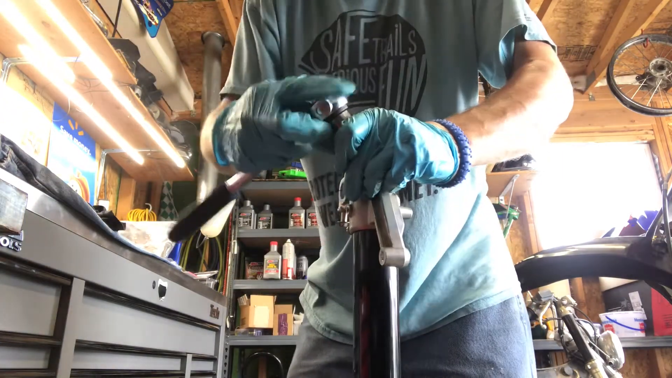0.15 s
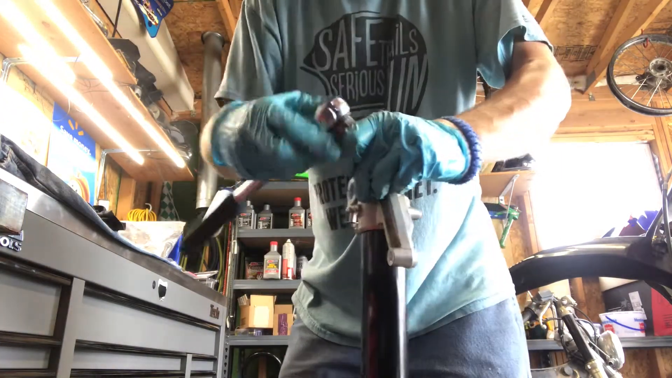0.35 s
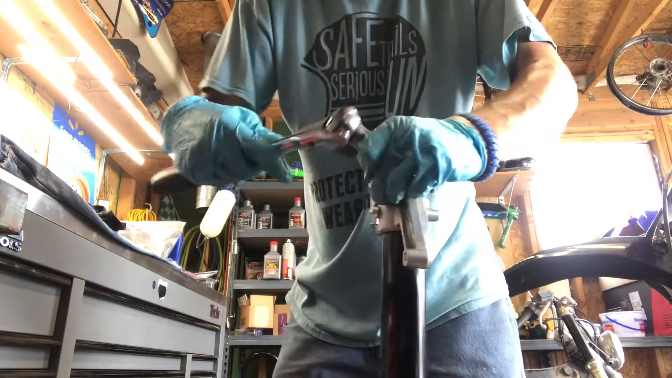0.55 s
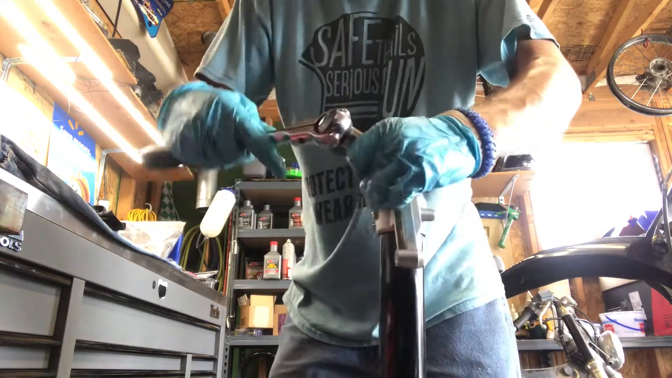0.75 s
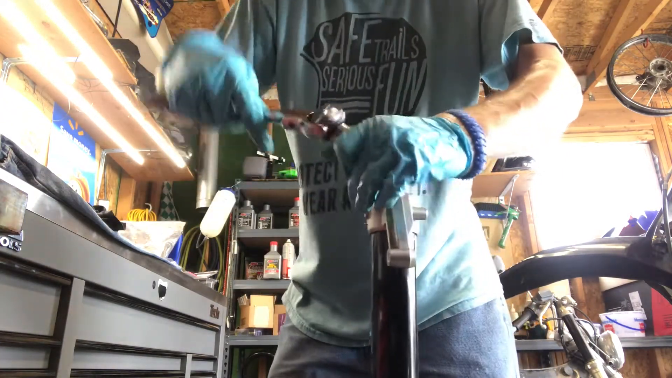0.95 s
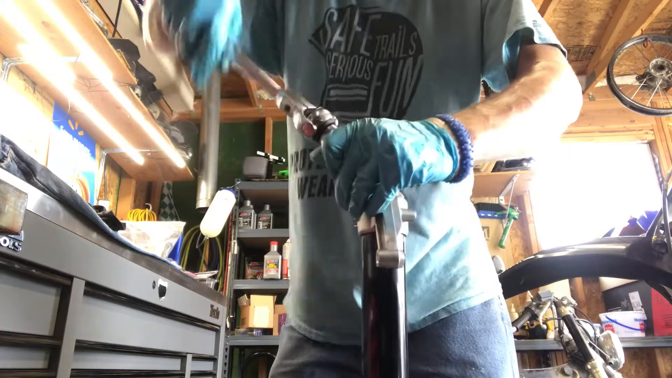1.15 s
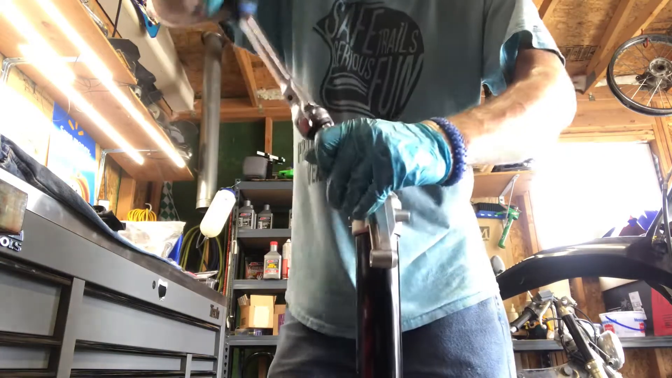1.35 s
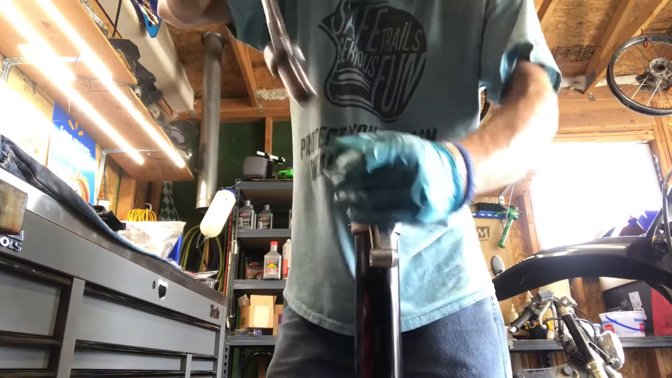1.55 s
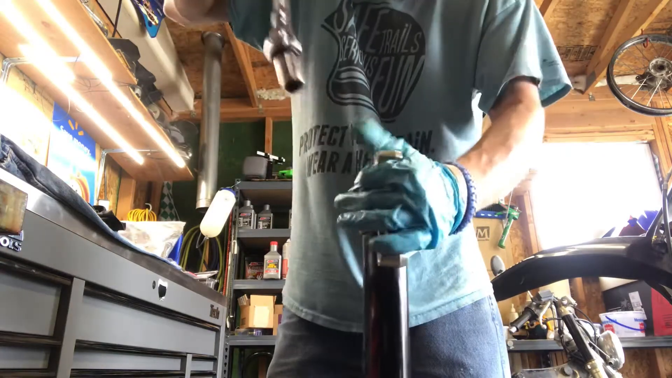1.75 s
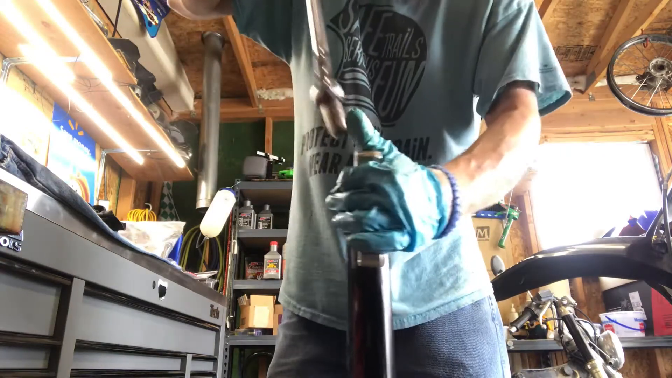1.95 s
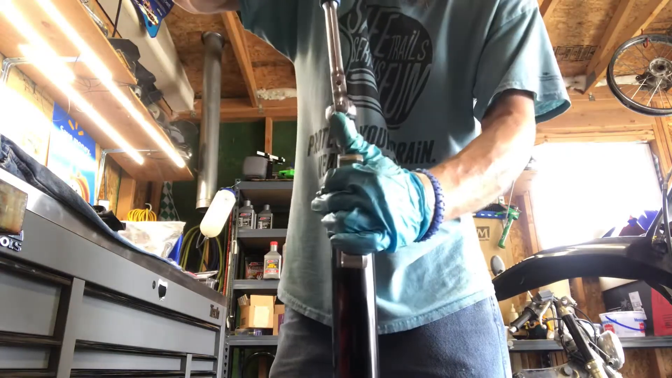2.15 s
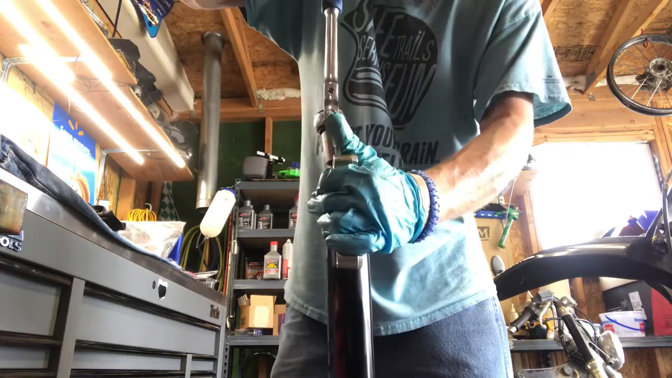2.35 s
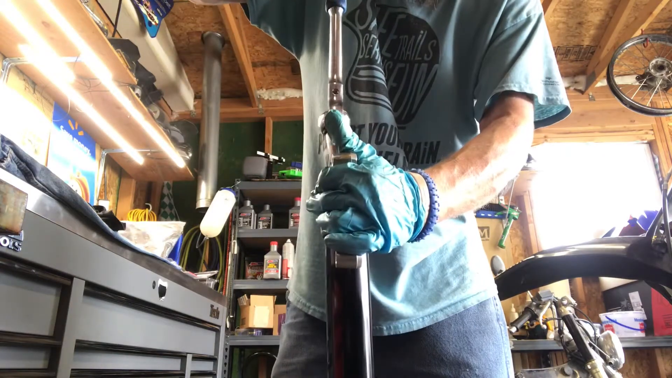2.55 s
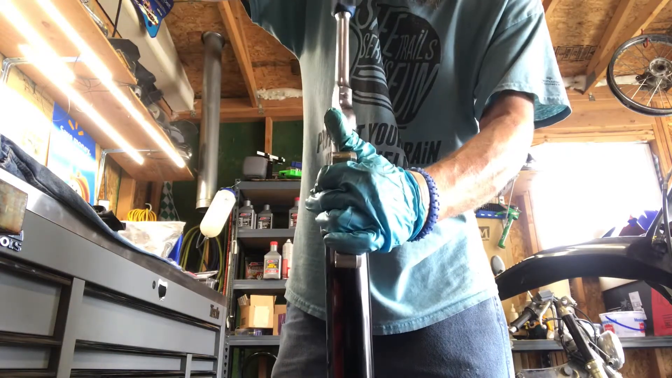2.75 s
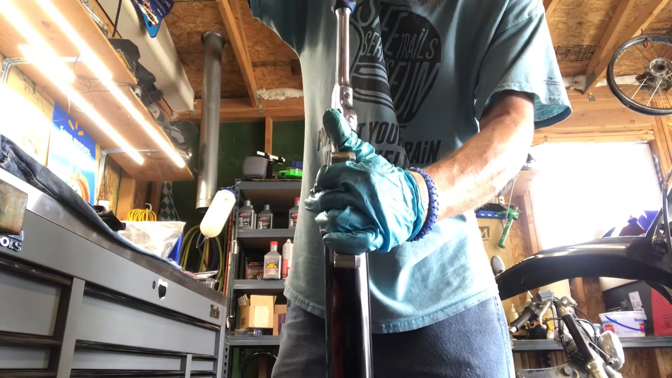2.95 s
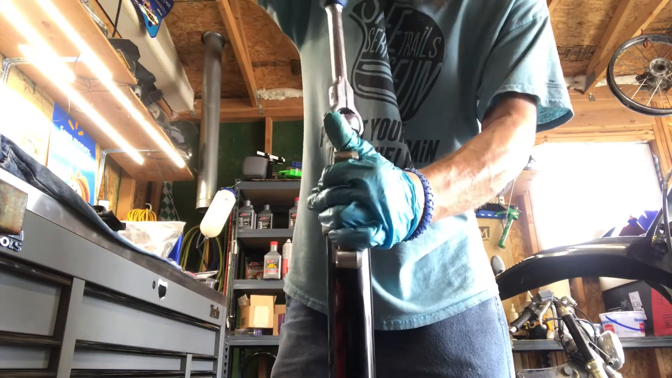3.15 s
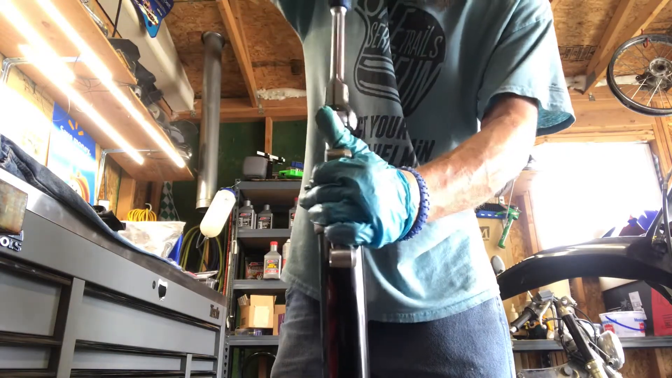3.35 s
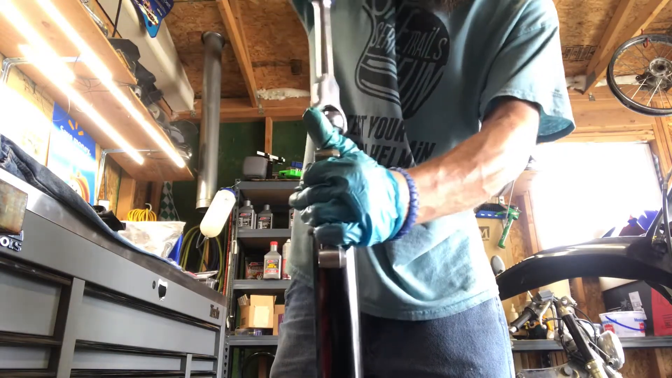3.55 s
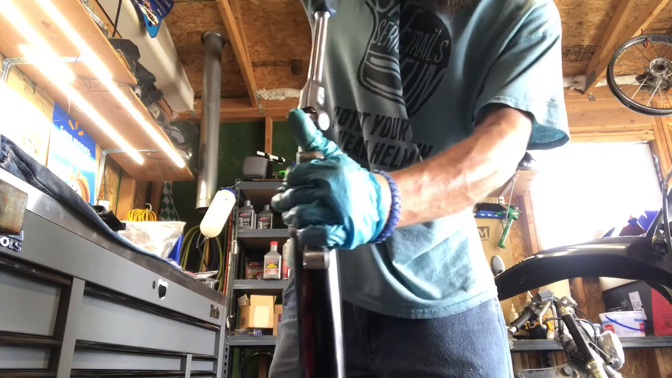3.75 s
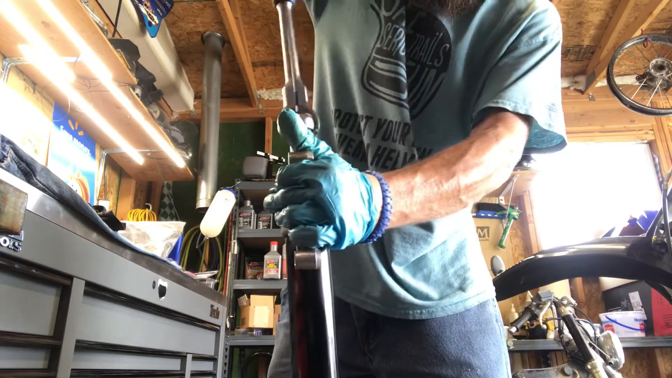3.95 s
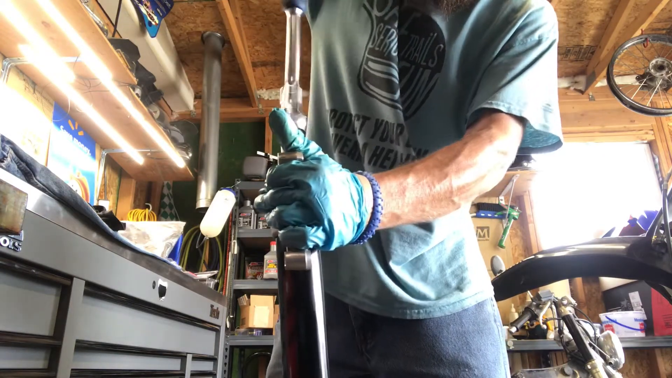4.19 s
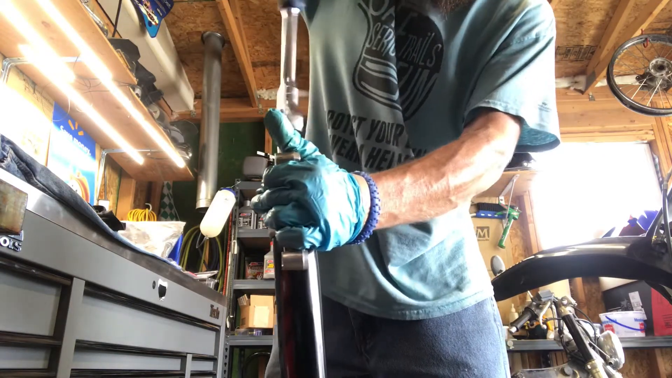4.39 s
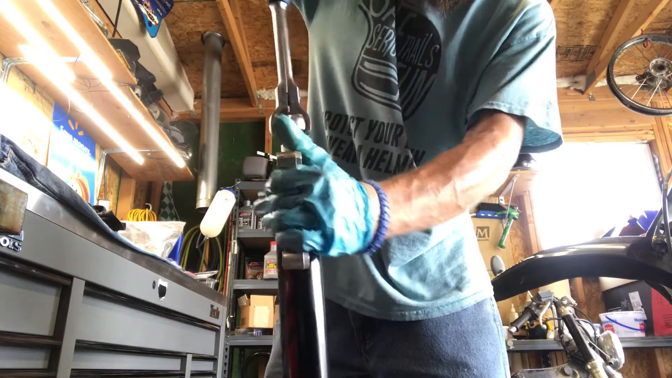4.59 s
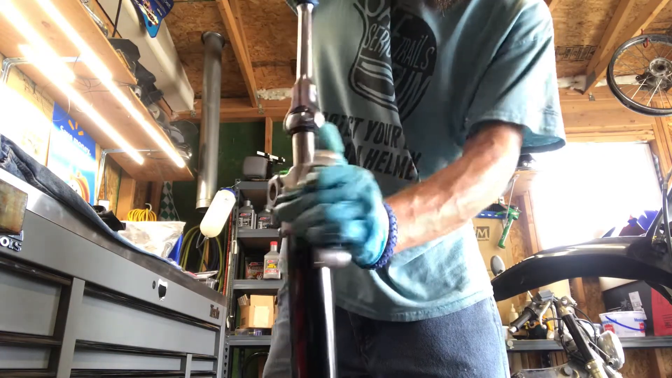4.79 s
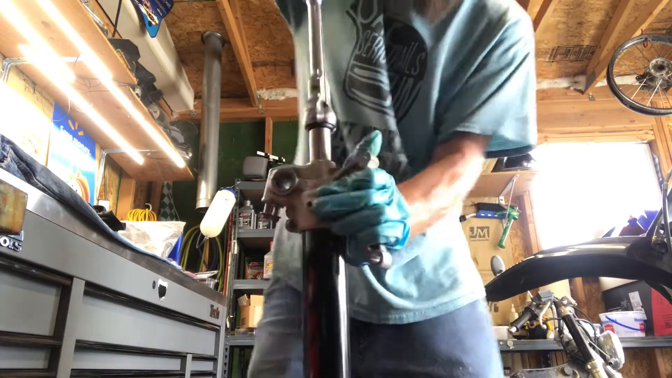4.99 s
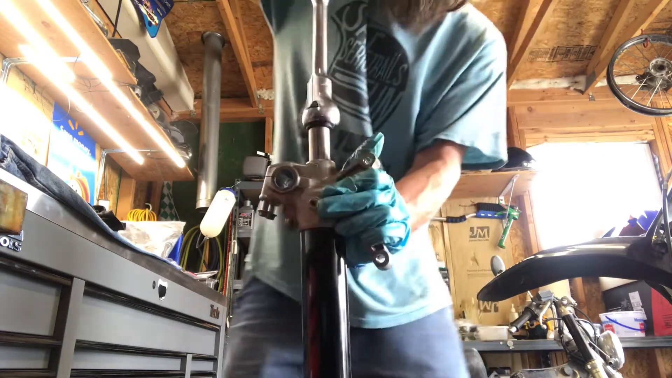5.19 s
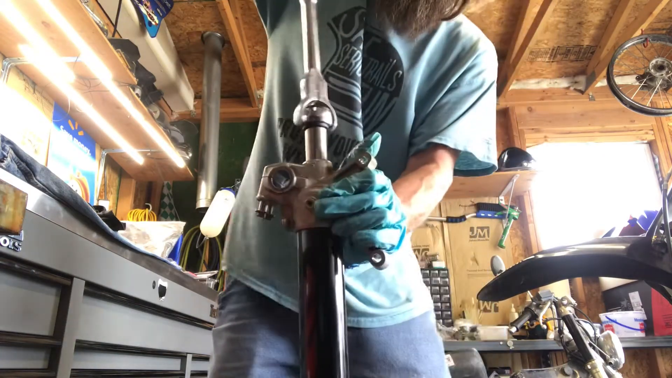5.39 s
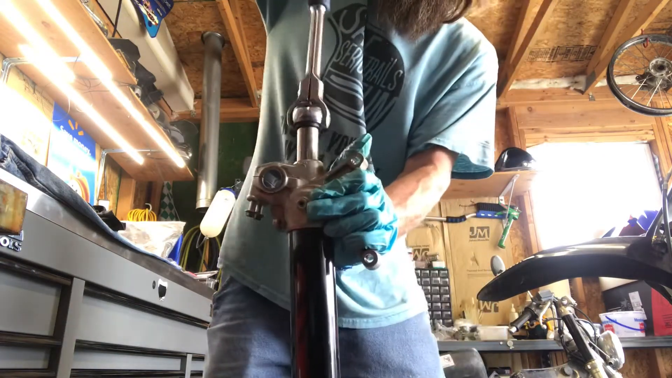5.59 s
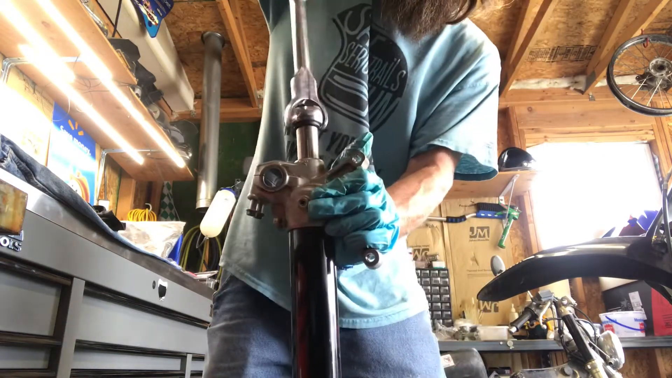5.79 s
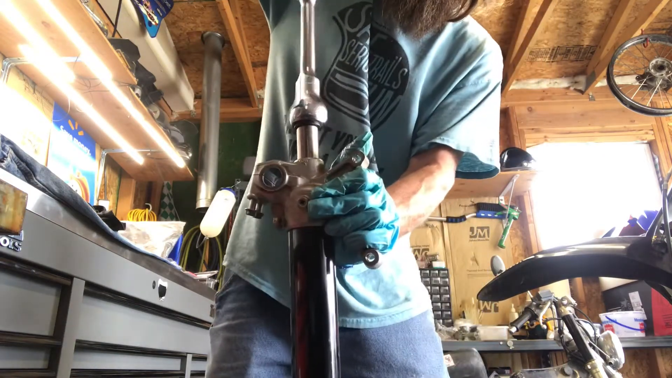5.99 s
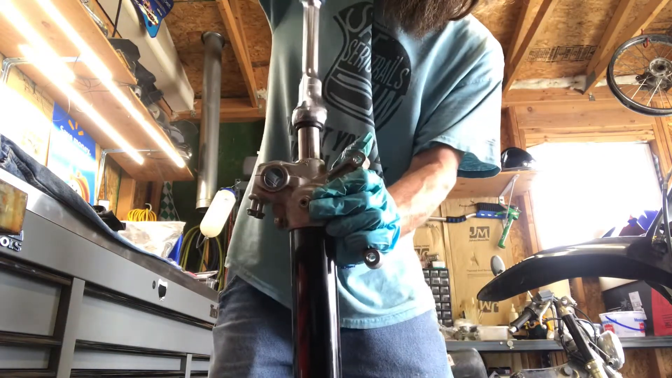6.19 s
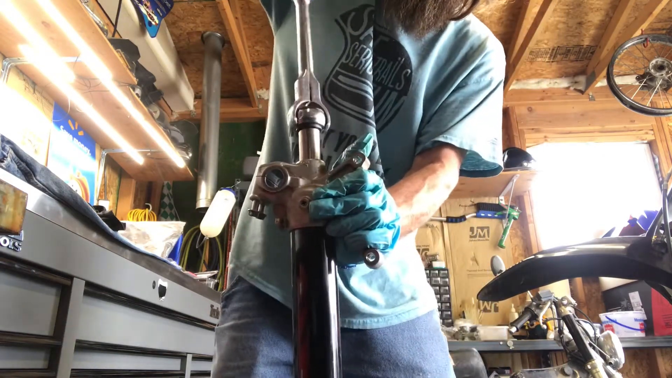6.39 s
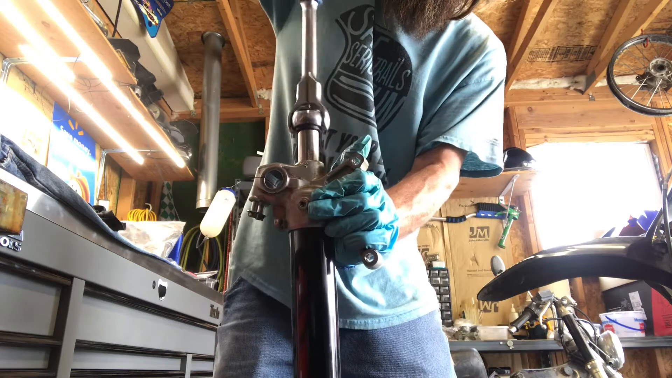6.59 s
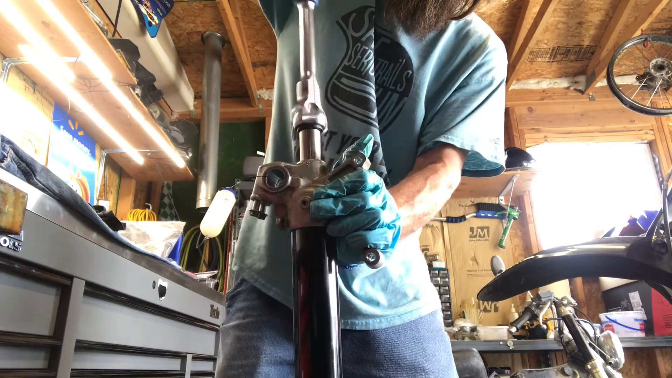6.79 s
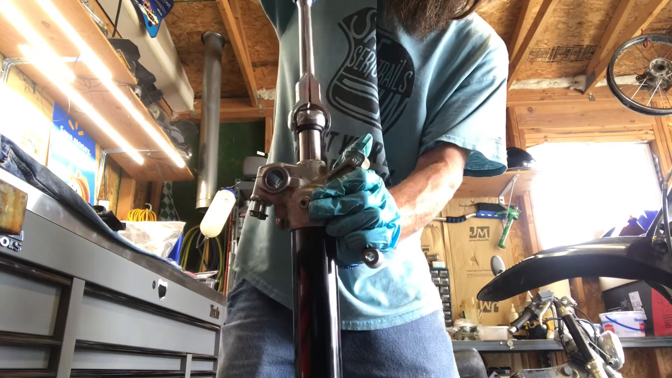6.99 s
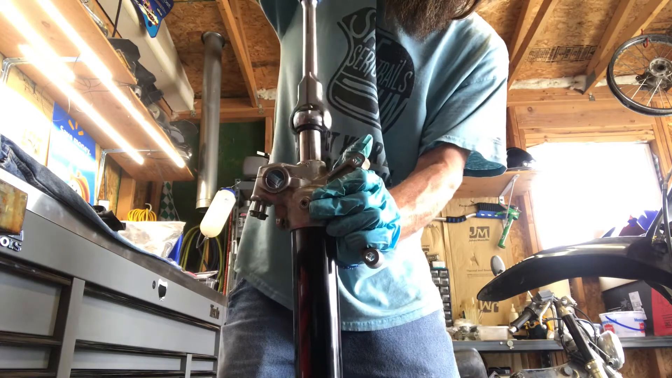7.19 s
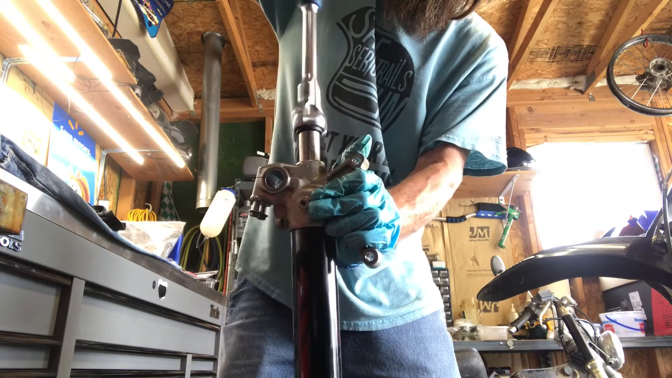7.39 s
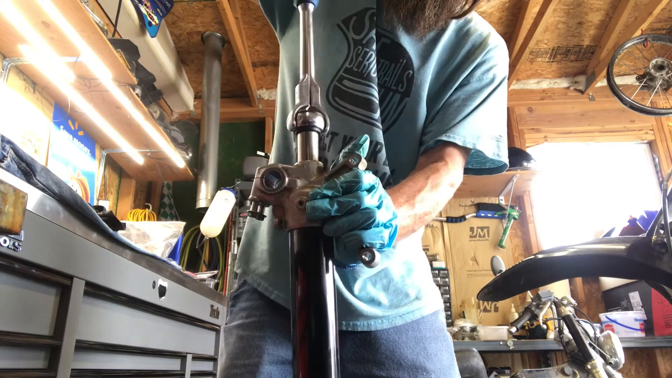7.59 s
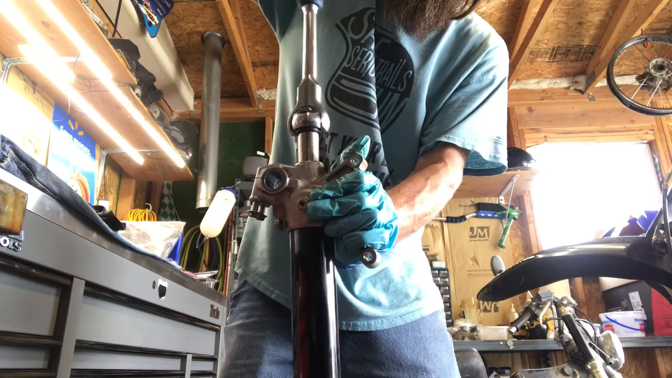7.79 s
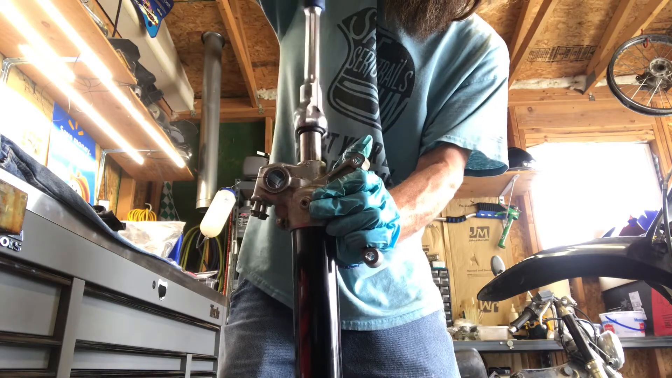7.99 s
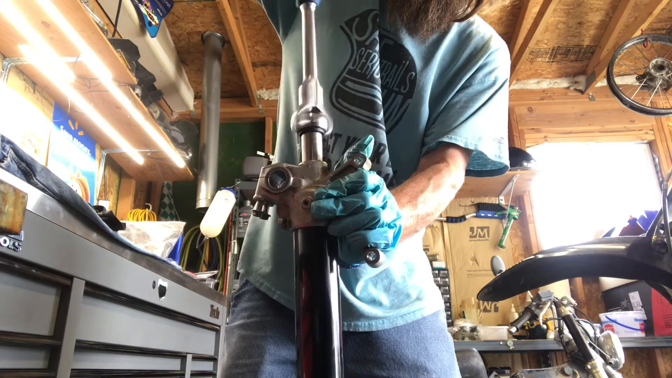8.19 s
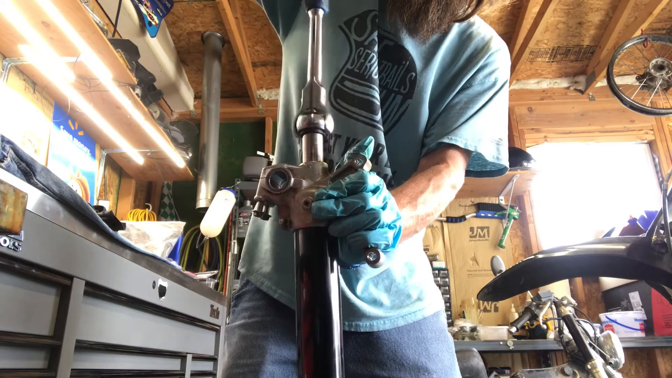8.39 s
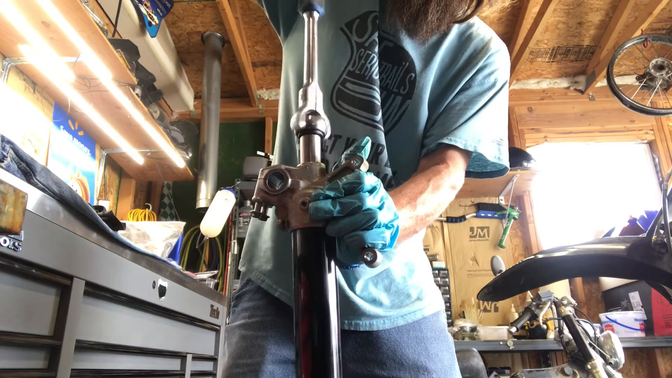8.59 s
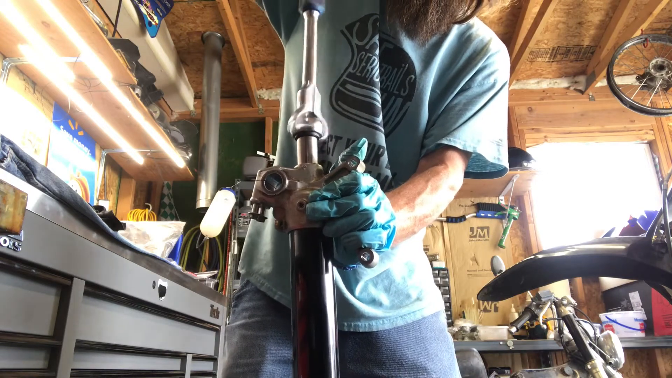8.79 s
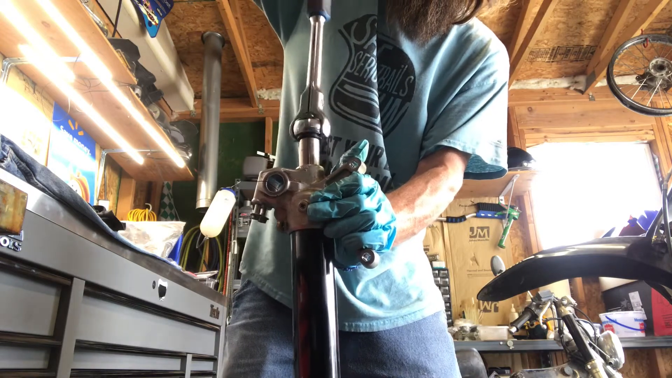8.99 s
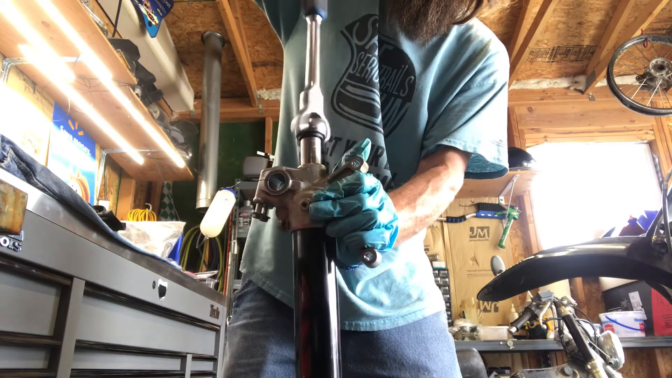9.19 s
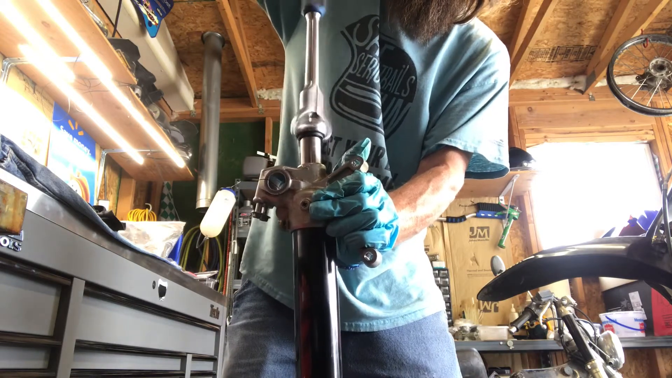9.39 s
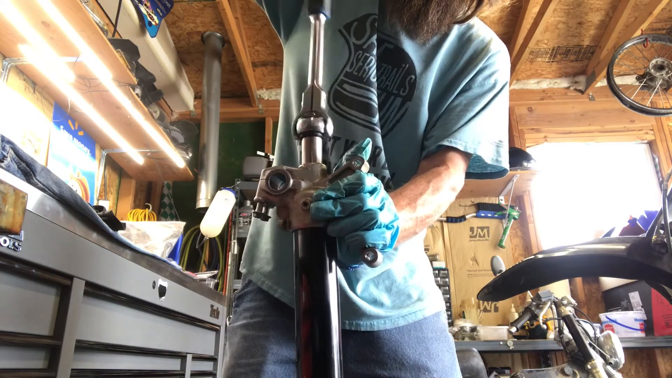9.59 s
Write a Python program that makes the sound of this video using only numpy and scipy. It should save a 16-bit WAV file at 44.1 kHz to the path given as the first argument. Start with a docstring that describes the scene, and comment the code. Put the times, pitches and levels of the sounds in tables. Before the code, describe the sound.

A socket ratchet ticks slowly, then works in steady strokes of quick clicking and metallic knocks in a small garage.

```python
"""A socket ratchet screws a threaded cap into a metal tube in a small, faintly humming garage.
First come a few slow clicks as the pawl (the ratchet's little catch) drops off one tooth at a time.
A knock follows, then gloves rustle as the grip changes. From 2.5 s the work settles into about three
strokes a second: on each drive the loose socket knocks and the thread grinds softly; on each back swing
the pawl races over the teeth. Near 5 s the hand takes a new hold, and the strokes go on to the end."""
import sys
import numpy as np
from scipy import signal
from scipy.fft import rfft, irfft, next_fast_len
from scipy.io import wavfile

SR = 44100
rng = np.random.default_rng(int(sys.argv[2]) if len(sys.argv) > 2 else 0)


def file_out(sig):
    """Save sig as 16-bit WAV at sys.argv[1]."""
    # one column per channel
    cols = np.atleast_2d(sig).T
    # limit, then scale
    lim = np.clip(cols, -1, 1)
    pcm = np.round(lim * 32767).astype(np.int16)
    wavfile.write(sys.argv[1], SR, pcm)


N = 425565

# Levels in the tables are relative: the functions add their own gains.
# Tone colour of still air, rubbing cloth and steel hitting steel: (pitch [Hz], level [dB])
AIR_COLOUR = [(12, -46), (20, -25.5), (60, 1), (81, -8.5), (110, -6.5), (241, -12.5), (434, -20.5),
              (472, -20.5), (780, -18), (1150, -20.5), (1400, -19.5), (1760, -24), (2390, -21),
              (10200, -40.5), (16000, -47)]
CLOTH_COLOUR = [(200, -44.5), (1000, -0.5), (3000, 3), (6000, 0), (10000, -5), (15000, -6.5), (17000, -26)]
STEEL_COLOUR = [(100, -32), (300, -17), (450, -26.5), (800, -11.5), (1500, 3), (3000, 1.5), (4800, 2),
                (6800, 3.5), (8500, 3), (11000, 0.5), (13000, 1.5), (14400, 5), (15800, -16.5)]
# Echoes from nearby surfaces: (delay [s], level [dB])
NEAR_ECHOES = [(.0018, 2.5), (.0045, -1.5), (0.0108, 0.5), (0.0138, -4)]
# The tones each metal part rings with; wider ones die sooner: (pitch [Hz], width [Hz], level [dB])
TUBE_TONES = [(286, 25, -12.5), (553, 71, -10.5), (703, 43, -7.5), (893, 49, 0), (1228, 62, -5),
              (1384, 42, 2.5), (1730, 15, -12), (1870, 42, -15.5), (2060, 460, -7)]
SOCKET_TONES = [(2760, 150, 3), (3800, 470, 8.5), (5320, 90, 7), (5850, 64, 5.5), (7760, 52, -19.5),
                (9560, 60, -20.5), (12350, 90, -34)]
HANDLE_TONES = [(710, 2.5, 2), (1777, 0.95, 2), (2580, 13, -5), (4280, 8.2, 2), (7570, 25, 10)]
HEAD_TONES = [(2620, 140, -6.5), (3740, 340, -6.5), (6250, 47, 1), (6605, 17, -4), (6840, 35, 3.5),
              (7147, 88, 2.5), (8920, 77, -7), (9800, 190, -0.5), (11940, 120, 1)]
PAWL_TONES = [(13100, 73, -14), (13930, 68, -10), (13900, 19, -0.5), (13900, 41, 7.5), (14170, 20, -6.5),
              (14090, 32, -14.5)]
# Glove and sleeve rub as the hands change hold: (middle time [s], length [s], level [dB])
GLOVE_RUBS = [(1.23, 0.56, -61), (1.645, 0.41, -58), (4.923, 0.23, -60.5)]
# How hard the thread drags as the cap goes in: (time [s], level [dB])
THREAD_DRAG = [(2.7, -51), (3.1, -53.5), (4.1, -42.5), (4.9, -50), (5.7, -42.5), (6.65, -44.5),
               (7.2, -53.5), (9.4, -48)]
# Clear knocks of the loose socket: (time [s], dull knock level [dB], bright steel level [dB])
SOCKET_KNOCKS = [(0.912, -38.5, -54.5), (2.621, -34.5, -48.5), (2.741, -27, -44), (3.253, -29.5, -38),
                 (3.495, -31.5, -48.5), (3.641, -30.5, -53), (3.855, -30, -72), (3.983, -35, -33.5),
                 (4.166, -34, -59), (4.192, -31.5, -63), (4.315, -32.5, -38.5), (4.648, -47, -40),
                 (5.295, -25.5, -45), (5.674, -32, -44.5), (5.981, -26, -62), (6.301, -26.5, -55),
                 (6.603, -32, -45), (6.727, -33.5, -54), (6.917, -30, -51), (7.213, -29, -52.5),
                 (7.855, -30.5, -42.5), (8.139, -34.5, -56.5), (8.799, -37, -46), (9.098, -39, -48.5)]
# Clicks of single teeth: (time [s], level [dB], pawl ring compared with that level [dB])
SINGLE_CLICKS = [(0.1175, -23, 16.5), (0.1721, -29.5, 7), (0.313, -29, 15.5), (0.3692, -26, 13),
                 (0.616, -28, 13), (0.6404, -26, 12), (0.6805, -28, 13.5), (2.8901, -34, 20)]
# Back swings: (start [s], length [s], level [dB], pawl ring compared with that level [dB])
BACK_SWINGS = [(2.774, 0.042, -42, 19), (3.275, 0.1, -33.5, 11), (3.666, 0.094, -33.5, 9),
               (4.005, 0.097, -32.5, 12), (4.337, 0.094, -32, 8), (4.66, 0.13, -34, 9.5),
               (5.128, 0.12, -33.5, 10.5), (5.474, 0.088, -31, 9.5), (5.801, 0.12, -32.5, 8.5),
               (6.143, 0.11, -32, 8), (6.464, 0.1, -31, 9.5), (6.762, 0.11, -34, 11),
               (7.07, 0.099, -32, 11), (7.366, .107, -32.5, 11), (7.662, 0.11, -31.5, 7.5),
               (7.954, 0.13, -33.5, 6), (8.295, 0.12, -32, 9.5), (8.6, 0.11, -33, 9),
               (8.899, 0.11, -32.5, 8), (9.19, 0.11, -32.5, 11), (9.487, 0.13, -34, 9)]


def undb(db):
    """Turn decibels into a number to multiply by."""
    return 10 ** (np.asarray(db) / 20)


def unit(x):
    """Scale a sound to a total energy of 1."""
    return x / np.sqrt(np.sum(x ** 2))


def clock(seconds):
    """The time of each sample in a short sound."""
    return np.arange(int(seconds * SR)) / SR


def add(out, start, x):
    """Mix x into out, beginning at start seconds."""
    i = int(np.clip(start * SR, 0, len(out)))
    out[i:i + len(x)] += x[:len(out) - i]


def tint(x, colour):
    """Give a sound a tone colour; the result has energy 1."""
    n = 2 * next_fast_len(len(x))
    hz, db = np.transpose(colour)
    gain = undb(np.interp(np.log(np.arange(n // 2 + 1) * SR / n + 1), np.log(hz), db))
    one_sided = irfft(np.log(gain))[:n // 2]  # so the filter never rings before a hit
    response = np.exp(2 * rfft(one_sided, n))
    return unit(irfft(rfft(x, n) * response)[:len(x)])


def fading_tones(rows, t):
    """One fading tone per table row, as complex numbers so its pitch is easy to shift."""
    hz, width, db = np.transpose(rows)[:, :, None]
    return undb(db) * np.sqrt(width) * np.exp((2j * hz - width) * np.pi * t)


def ring(tones, scatter_db=3):
    """Every blow lands a little differently, so it mixes a part's tones anew."""
    weights = undb(scatter_db * rng.standard_normal(len(tones))) * rng.choice([-1, 1], len(tones))
    return unit(weights @ tones.real)


def garage(x, walls, wet_db, early_s=0.11, late_s=0.27, build_s=0.00048):
    """Add near echoes and a short tail (level wet_db); some paths stay, others shift as the arms move."""
    t = np.arange(len(walls)) / SR
    moving, far = rng.standard_normal((2, len(t)))
    early = (walls + moving) * (1 - np.exp(-t / build_s)) * undb(-60 * t / early_s)
    far = signal.lfilter([1, 2, 1], [1, -0.25], far)  # the far walls soak up treble
    late = far * undb(-60 * t / late_s)
    paths = np.zeros(len(t))
    paths[0] = 1  # the direct sound
    for delay, db in NEAR_ECHOES:
        add(paths, delay * (1 + .02 * rng.standard_normal()), undb([db]))
    tail = undb(1) * unit(early) + undb(-7) * unit(late)
    return signal.fftconvolve(x, unit(unit(paths) + undb(wet_db) * tail))


def room_tone(hum_hz=58, waver_hz=0.86, hum_db=-66, air_db=-58):
    """Soft steady air with a low wavering hum."""
    hz = hum_hz + waver_hz * signal.resample(rng.standard_normal(N // 4410), N)
    hum = np.sin(2 * np.pi * np.cumsum(hz) / SR)
    air = tint(rng.standard_normal(N), AIR_COLOUR)
    return np.sqrt(N) * (undb(air_db) * air + undb(hum_db) * unit(hum))


def gloves(walls, spread_db=6, grab_s=4.995, grab_db=-22):
    """Rubber and cloth slide in many tiny catches; the hand takes a new hold with a soft bump."""
    t = np.arange(N) / SR
    catches = np.repeat(undb(spread_db * rng.standard_normal(N // 64 + 1)), 64)[:N]
    rustle = garage(catches * rng.standard_normal(N), walls, wet_db=7)[:N]
    swells = sum(undb(db) * np.cos(np.pi * np.clip((t - middle) / length, -.5, .5))
                 for middle, length, db in GLOVE_RUBS)
    out = np.sqrt(N) * tint(rustle, CLOTH_COLOUR) * swells
    bump = fading_tones([(194, 11.6, 0.4), (273, 30, -2.4)], clock(0.13))
    add(out, grab_s, undb(grab_db) * ring(1j * bump))  # 1j starts the tones at zero, with no click
    return out


def crack(t, decay_s=0.0015):
    """Steel meets steel: a burst of noise that dies quickly."""
    return tint(rng.standard_normal(len(t)) * np.exp(-t / decay_s), STEEL_COLOUR)


def knock(parts, dull_hz=2500, clack_db=-0.5, grip_s=.005):
    """A blunt blow on the tube: little treble, and the gripping hand cuts the ring short."""
    t, _, _, tube = parts
    held = ring(tube, scatter_db=4.5) * np.exp(-t / grip_s) + undb(clack_db) * crack(t)
    return unit(signal.lfilter(*signal.butter(2, dull_hz, fs=SR), held))


def drives(first_s=2.5):
    """The hand drives the cap in before each back swing: gives rows of (start [s], end [s])."""
    starts = [first_s] + [start + length for start, length, *_ in BACK_SWINGS[:-1]]
    return [(start, swing[0]) for start, swing in zip(starts, BACK_SWINGS)]


def thread_grind(parts, slips_per_s=90, gain_db=14, spread_db=6, grit_db=-4, dull_hz=4000, ease_db=-5):
    """The greased thread sticks and slips, ringing the tube; the push eases late in each drive."""
    t, _, _, tube = parts
    out = np.zeros(N)
    for start, end in drives():
        for progress in rng.uniform(0, 1, int(slips_per_s * (end - start))):
            slip = ring(tube, scatter_db=7) + undb(grit_db) * crack(t, decay_s=0.021)
            db = gain_db + ease_db * progress ** 2 + spread_db * (2 * rng.random() - 1)
            add(out, start + progress * (end - start), undb(db) * slip)
    drag = undb(np.interp(np.arange(N) / SR, *np.transpose(THREAD_DRAG)))
    return signal.lfilter(*signal.butter(1, dull_hz, fs=SR), out) * drag


def socket_knocks(parts, walls, tube_db=14, steel_db=19.5, crack_db=2, rattles_per_drive=3):
    """The loose socket pings and knocks on the tube as the handle turns round, and rattles in drives."""
    t = parts[0]
    out, socket, rattles = np.zeros(N), fading_tones(SOCKET_TONES, t), []
    for start, end in drives():
        for time in rng.uniform(start, end, rattles_per_drive):
            drag_db = np.interp(time, *np.transpose(THREAD_DRAG))
            db = drag_db + 4 + 4.5 * rng.standard_normal()  # more drag, louder rattle
            rattles.append((time, db, db - 13))
    for time, dull_db, bright_db in list(SOCKET_KNOCKS) + rattles:
        steel = ring(socket) + undb(crack_db) * crack(t)
        blow = undb(dull_db + tube_db) * knock(parts) + undb(bright_db + steel_db) * steel
        add(out, time, garage(blow, walls, wet_db=-6))
    return out


def tooth_click(parts, pawl_db, tube_db, head_db, shift_hz):
    """The pawl drops off a tooth: a crack and its own shrill ring; the ratchet head and tube ring too."""
    t, pawl, head, tube = parts
    shrill = ring(pawl * np.exp(2j * np.pi * shift_hz * t))  # how the pawl sits shifts its pitch
    return crack(t) + undb(pawl_db) * shrill + undb(head_db) * ring(head) + undb(tube_db) * ring(tube)


def slow_clicks(parts, walls, gain_db=18, handle_db=-17, thin_hz=1400, palm_s=0.0066):
    """Turned back tooth by tooth, the ratchet gives light ticks; the loosely held handle rings on."""
    t = parts[0]
    out, handle = np.zeros(N), fading_tones(HANDLE_TONES, clock(1))
    bass_cut = signal.butter(1, thin_hz, "high", fs=SR)
    for time, db, ring_db in SINGLE_CLICKS:
        click = tooth_click(parts, pawl_db=ring_db + 1, tube_db=-21, head_db=-5, shift_hz=220)
        tick = signal.lfilter(*bass_cut, click) * np.exp(-t / palm_s)  # the palm damps the ring
        add(out, time, undb(db + gain_db) * garage(tick, walls, wet_db=-2))
        add(out, time, undb(db + gain_db + handle_db) * ring(handle))
    return out


def back_swings(parts, walls, top_teeth_per_s=270, start_speed=.78, end_speed=.22, unhurried_s=0.13,
                gain_db=23, force_db=5, first_tooth_db=2, swing_shift_hz=70, tooth_shift_hz=190):
    """The pawl races over the teeth as the handle speeds up and slows; faster teeth hit harder."""
    out = np.zeros(N)
    for start, length, db, ring_db in BACK_SWINGS:
        # just before the first tooth, the reversing handle nudges the tube
        add(out, start - 0.0053, undb(db + gain_db - 16) * knock(parts))
        fastest, end = start + .46 * length, start + length
        haste = 1 - length / unhurried_s  # a hasty swing rings the head more and the tube less
        time, shift_hz = start, swing_shift_hz * rng.standard_normal()
        for gap_luck, pitch_luck in rng.standard_normal((64, 2)):
            if time > end:
                break
            slowest = start_speed if time < fastest else end_speed  # as a share of top speed
            speed = 1 - (1 - slowest) * np.interp(time, [start, fastest, end], [1, 0, 1]) ** 1.5
            # the first tooth breaks free with extra force
            blow_db = force_db * np.log2(speed) + first_tooth_db * (time == start)
            click = tooth_click(parts, pawl_db=ring_db + 2, tube_db=-12.5 - 6 * haste,
                                head_db=-4 + 11 * haste, shift_hz=shift_hz + tooth_shift_hz * pitch_luck)
            add(out, time, undb(db + gain_db + blow_db) * garage(click, walls, wet_db=0))
            time += np.exp(.05 * gap_luck) / (top_teeth_per_s * speed)
    return out


def scene():
    """Mix the room, the gloves and the ratchet into one channel."""
    t = clock(.03)
    parts = t, fading_tones(PAWL_TONES, t), fading_tones(HEAD_TONES, t), fading_tones(TUBE_TONES, t)
    walls = rng.standard_normal(int(.22 * SR))  # the echo paths that stay the same
    background = room_tone() + gloves(walls)
    tool = slow_clicks(parts, walls) + socket_knocks(parts, walls) + back_swings(parts, walls)
    return (background + tool + thread_grind(parts))[None]


def record(dry, low_hz=32, top_hz=15400):
    """Thin the deepest bass and cut the very highest treble."""
    thinned = signal.sosfilt(signal.butter(2, low_hz, "high", fs=SR, output="sos"), dry)
    return signal.sosfilt(signal.ellip(8, .2, 70, top_hz, fs=SR, output="sos"), thinned)


dry = scene()
out = record(dry)
file_out(out)
```